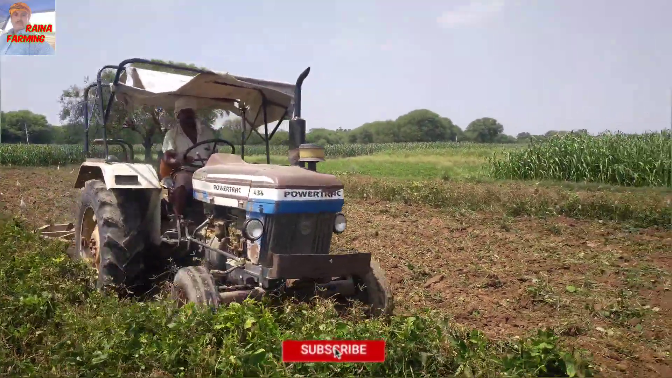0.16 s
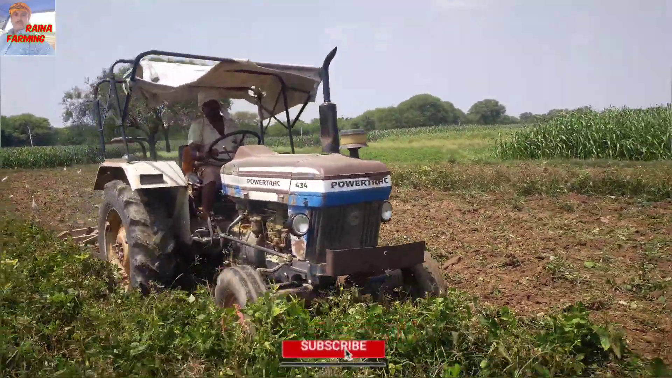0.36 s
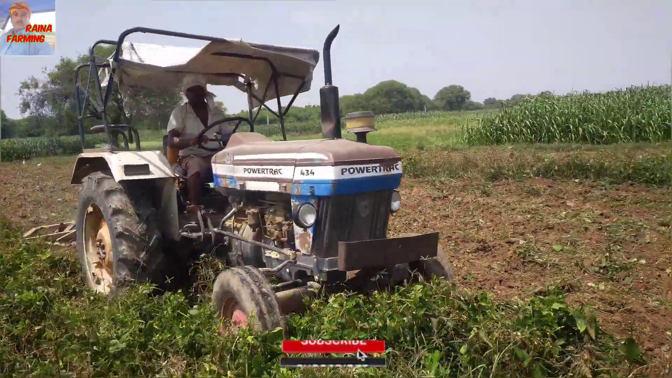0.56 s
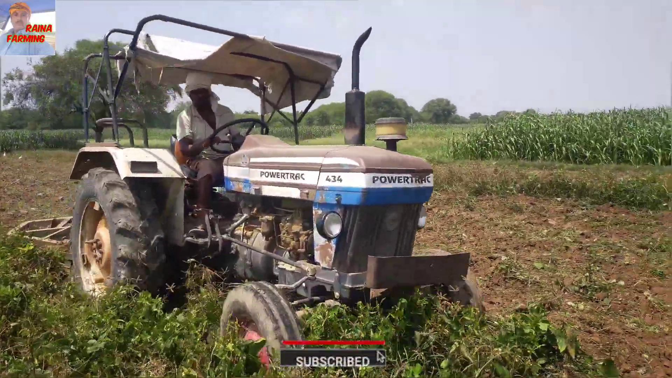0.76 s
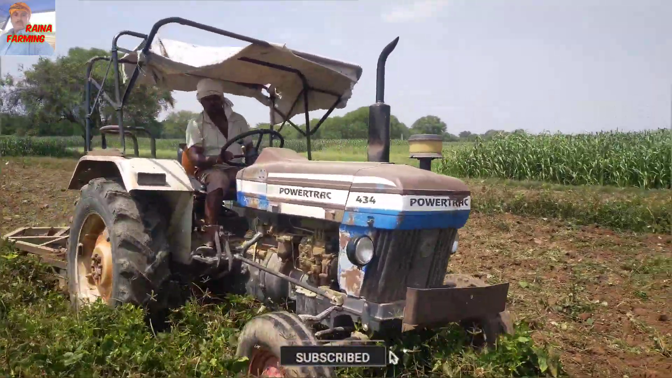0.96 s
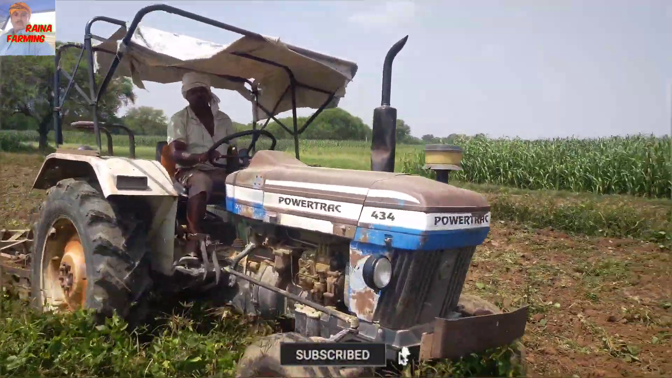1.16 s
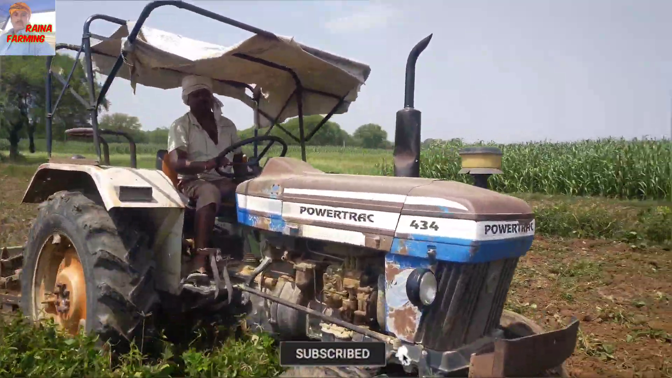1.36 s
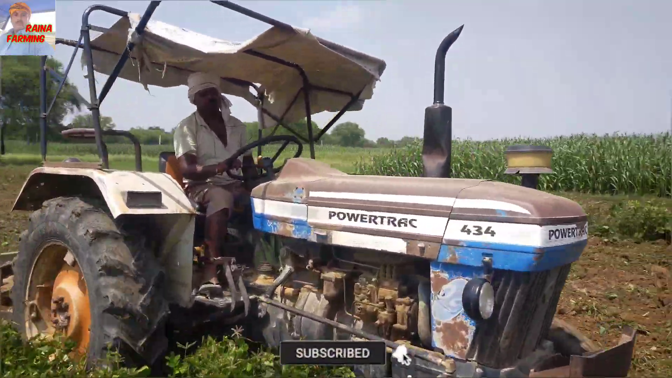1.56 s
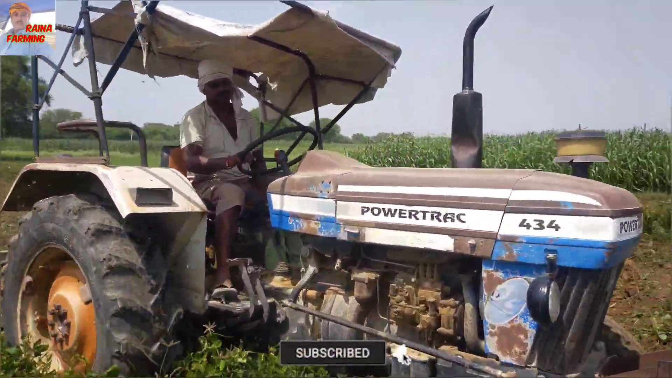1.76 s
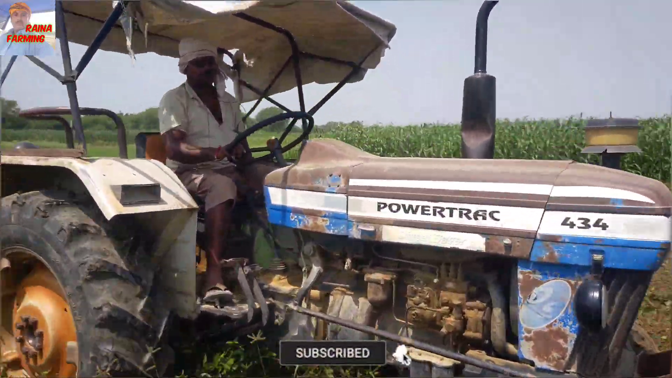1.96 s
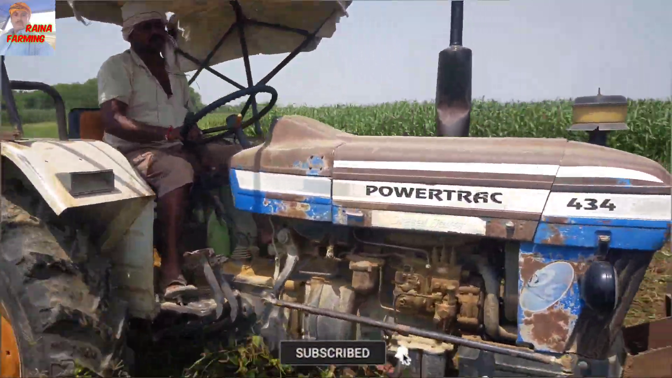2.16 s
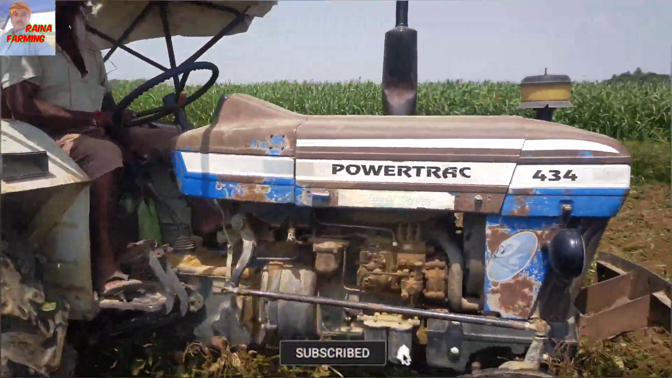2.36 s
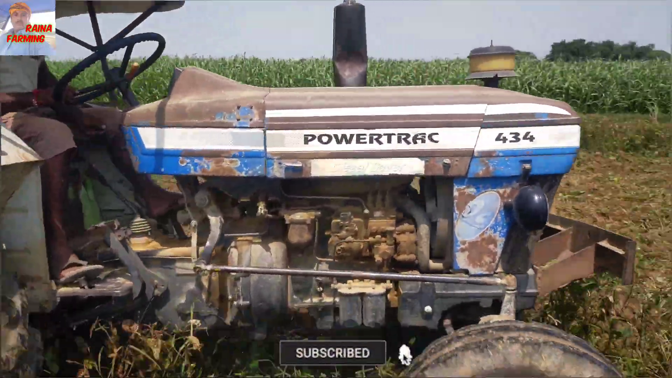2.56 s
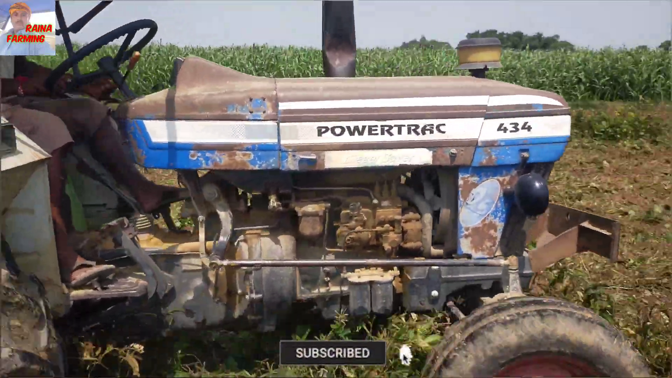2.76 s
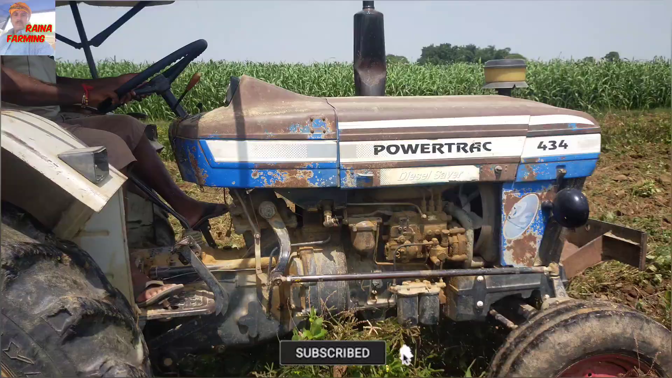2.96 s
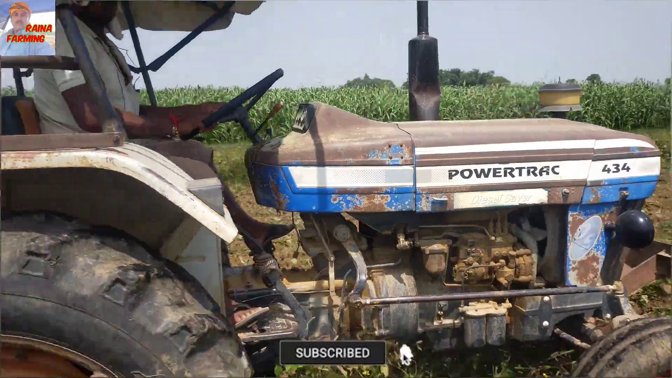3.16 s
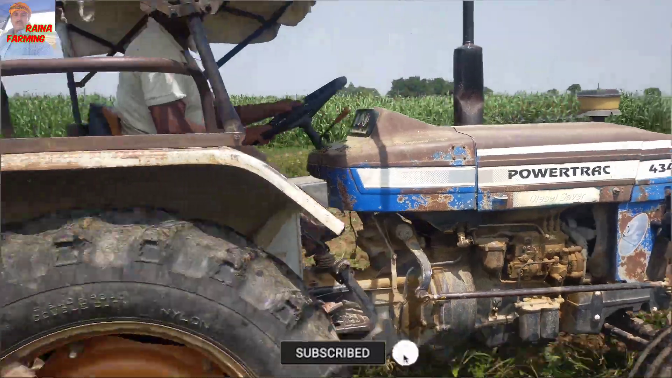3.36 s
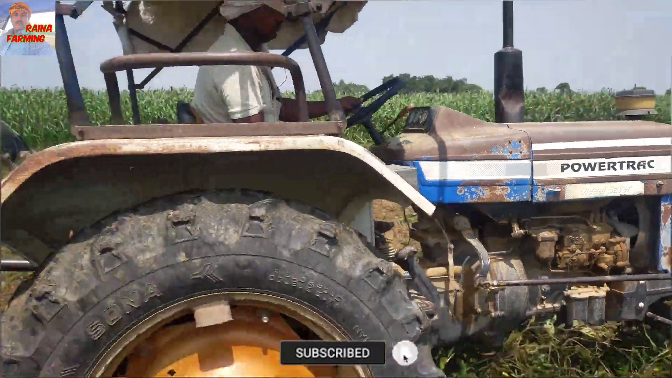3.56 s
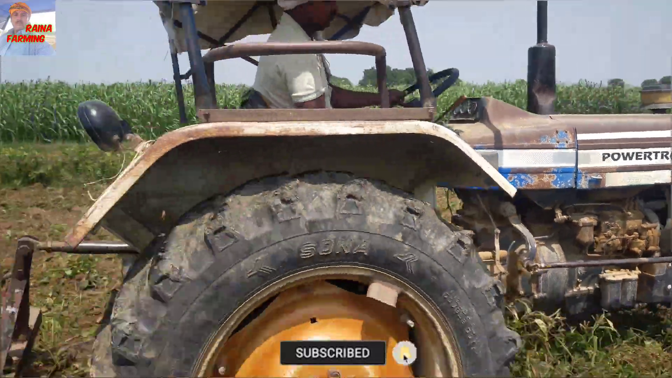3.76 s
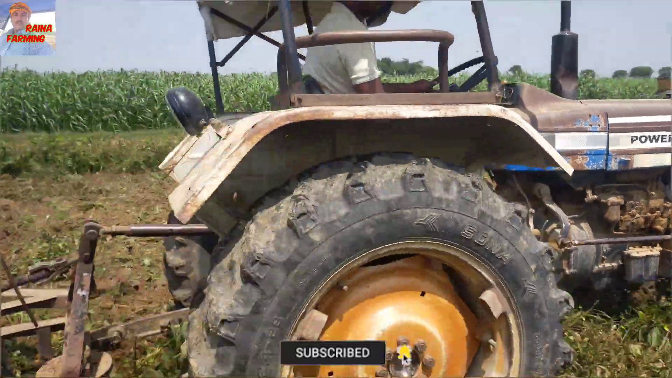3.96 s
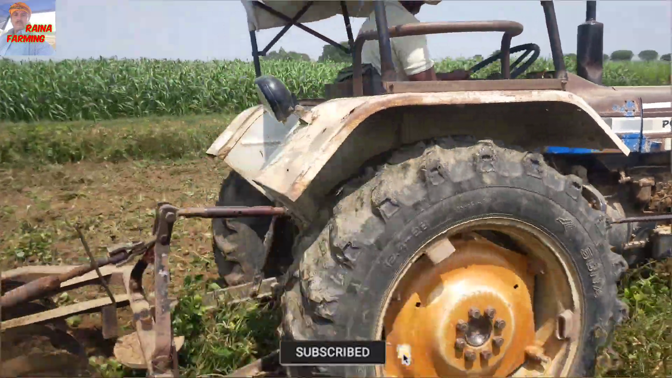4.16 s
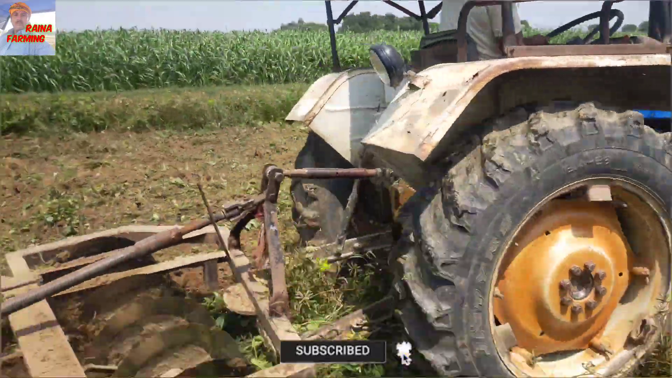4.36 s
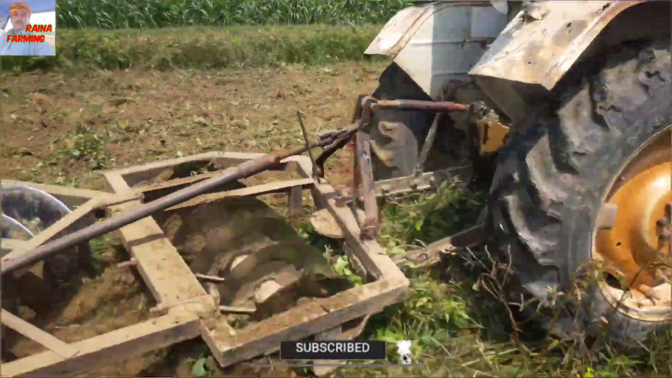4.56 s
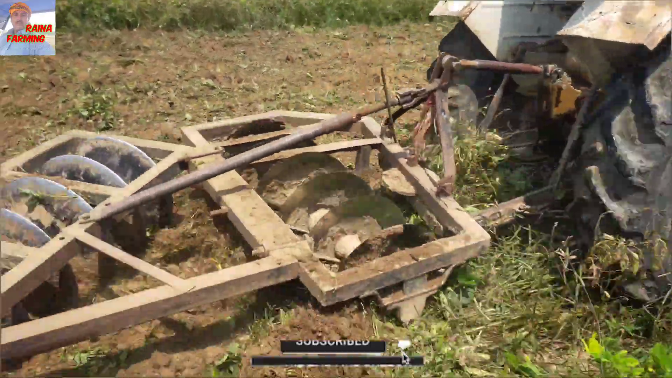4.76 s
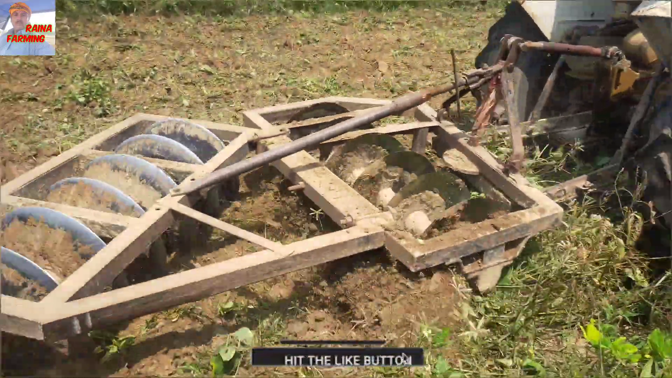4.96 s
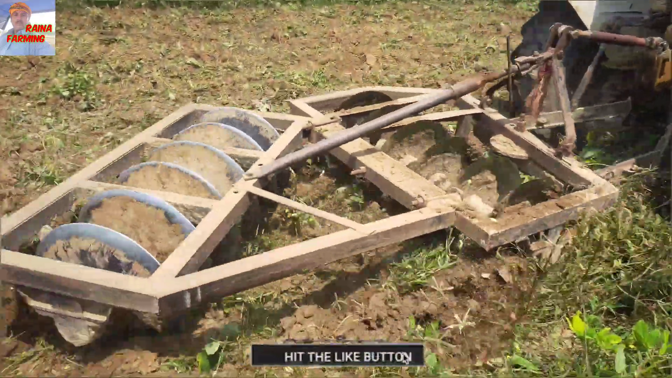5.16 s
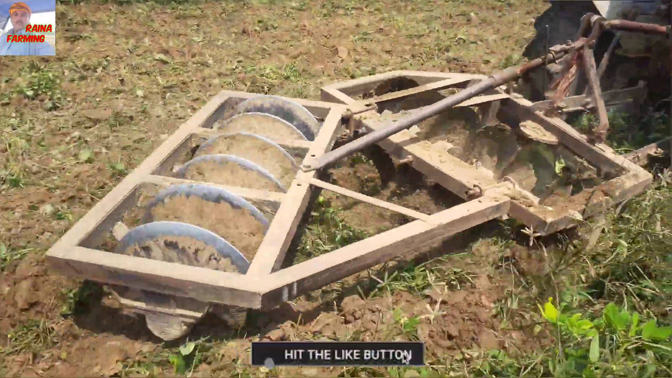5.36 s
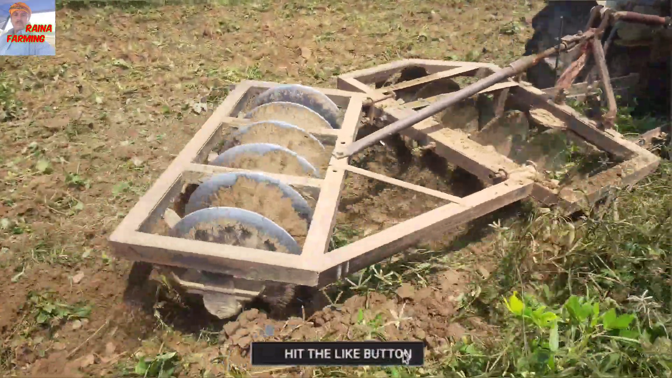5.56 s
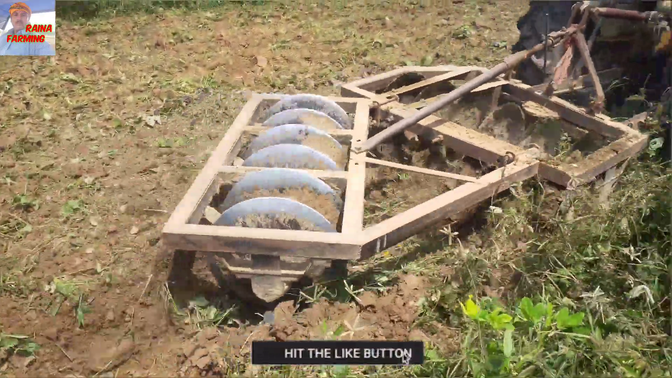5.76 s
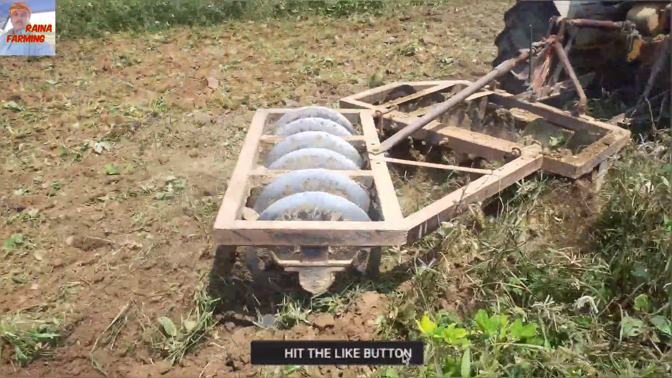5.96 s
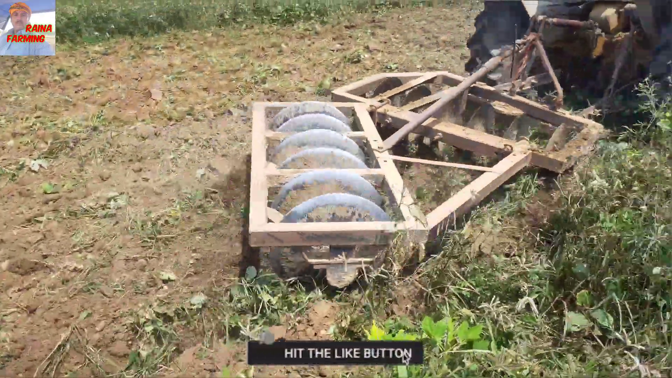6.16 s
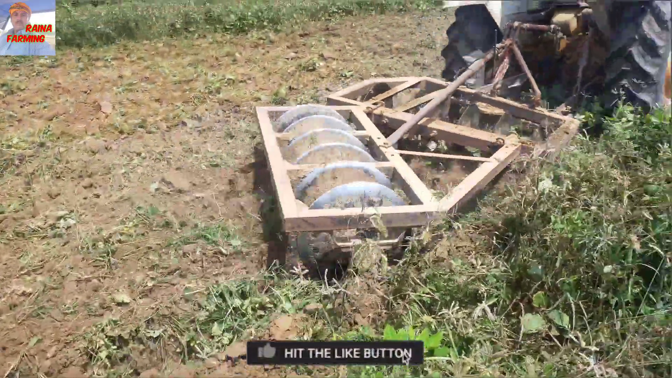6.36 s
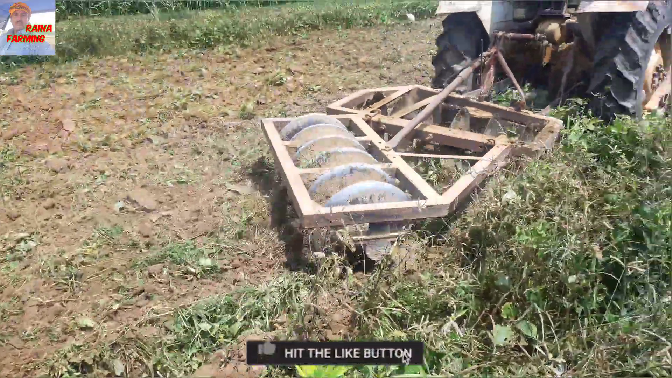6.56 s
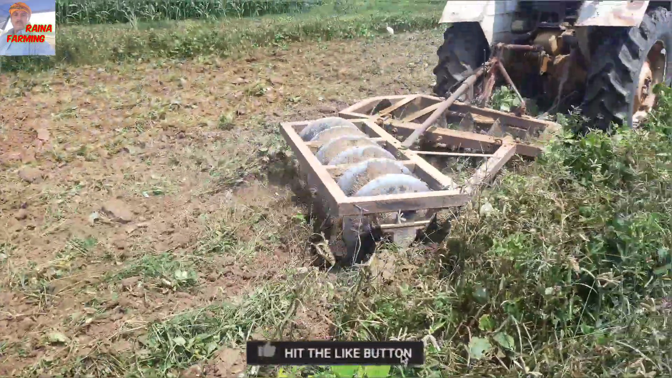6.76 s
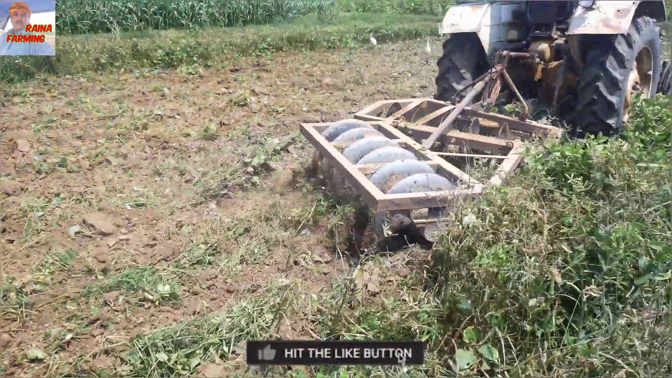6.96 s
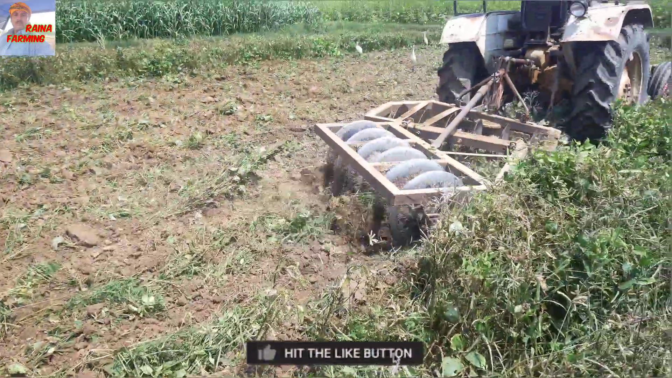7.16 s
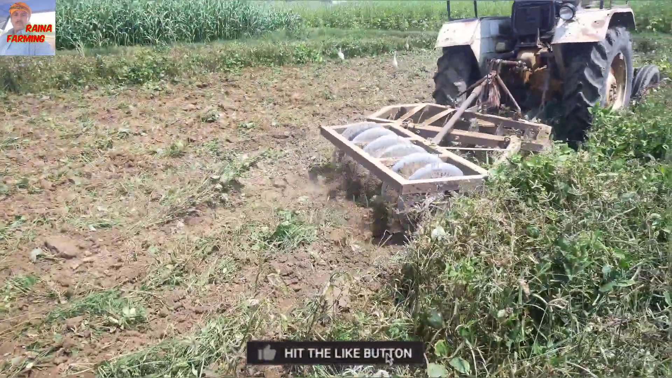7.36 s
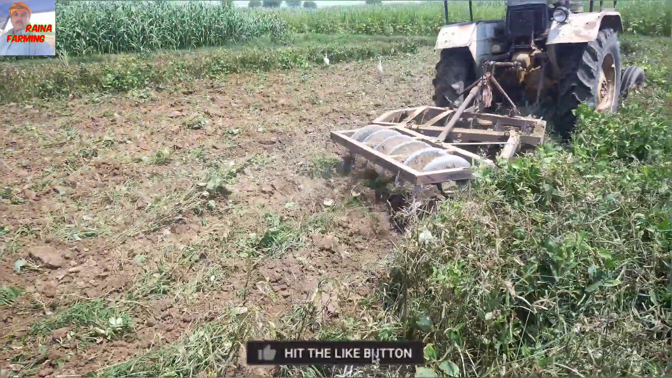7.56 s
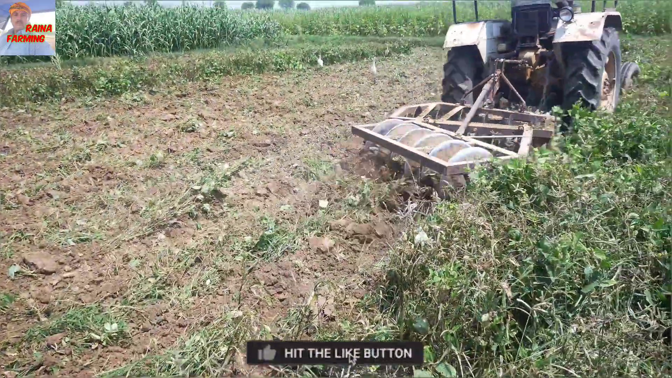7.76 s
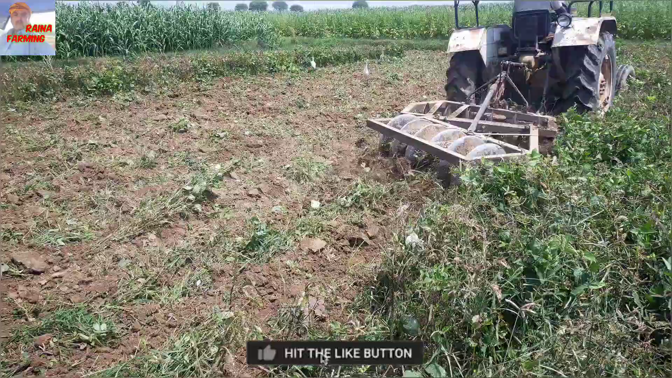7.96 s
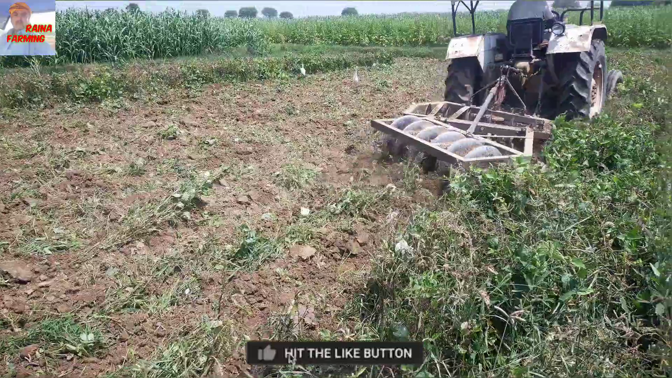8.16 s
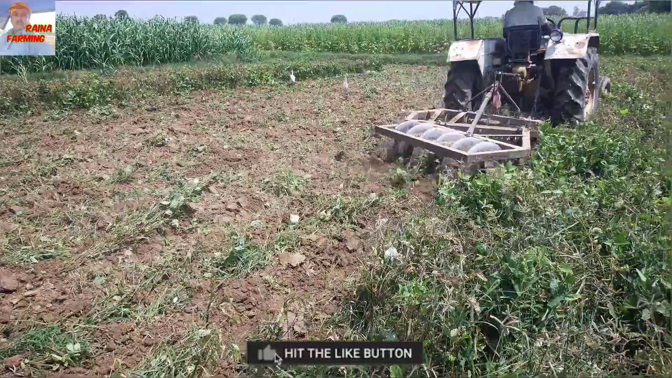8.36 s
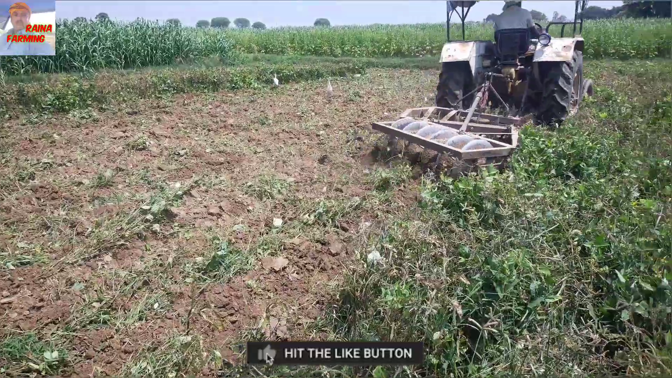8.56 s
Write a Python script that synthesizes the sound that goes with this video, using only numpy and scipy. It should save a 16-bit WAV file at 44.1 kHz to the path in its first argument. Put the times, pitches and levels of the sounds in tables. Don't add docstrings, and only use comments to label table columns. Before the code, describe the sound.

A three-cylinder diesel tractor hammers past at close range, knocking and clattering, then recedes across the field with faint bearing squeaks and valve ticks.

```python
import sys
import numpy as np
from scipy import signal
from scipy.fft import rfft, irfft, next_fast_len
from scipy.io import wavfile
from scipy.ndimage import map_coordinates

SR = 44100
rng = np.random.default_rng(int(sys.argv[2]) if len(sys.argv) > 2 else 0)


def put_to_file(sound):
    columns = np.atleast_2d(sound).T
    safe = np.clip(columns, -1, 1)
    whole_steps = np.round(safe * 32767)
    wavfile.write(sys.argv[1], SR, whole_steps.astype(np.int16))


def invert_db(level):
    return 10 ** (np.asarray(level, dtype=float) / 20)


N = 379260
T = np.arange(N) / SR

# time in seconds, firings a second.
FIRING_RATE = [(0.0, 40.87), (0.8, 40.8), (1.6, 41.5), (2.0, 41.28), (2.4, 41.57), (2.8, 41.03),
               (3.6, 40.68), (4.4, 40.95), (4.8, 40.47), (5.2, 40.81), (6.0, 40.87), (6.4, 41.24),
               (7.6, 40.4), (8.0, 40.98), (8.6, 40.42)]
# time in seconds, turn (0 front, 1 side, 2 quarter, 3 rear),
# ground notch in Hz, knock sharpness 0-1.
ATTITUDE = [
    (0, 0, 686, 0.4),
    (1, 0.76, 660, .58),
    (1.6, 0.75, 676, 0.34),
    (3, 1.5, 734, 0.47),
    (4.1, 2.06, 710, 0.34),
    (4.7, 2, 770, 0.16),
    (6, 2.5, 772, 0.05),
    (7, 3, 686, 0.3),
    (8.6, 3, 633, 0.3),
]
# time in seconds, level in dB.
CLOSENESS = [(0, -3), (.24, -3), (.91, -2), (1.27, 0.5), (1.34, -3), (1.45, 0), (1.89, 1), (1.96, -0.5),
             (2.68, -1.5), (3.1, -0.5), (4.25, -1.5), (4.6, -2.5), (5.1, -6), (5.77, -8.5), (6.5, -11),
             (7, -11.5), (8, -15.5), (8.6, -15.5)]
BODY_LEVELS = {"rumble": (-29, -26.5, -24, -23.5), "knock": (-16.5, -17, -17, -16),
               "clatter": (-33, -34, -31.5, -33), "hiss": (-37.5, -38, -35, -35.5),
               "panel": (-27.5, -29.5, -31.5, -37.5), "low gear": (-44.5, -42, -40, -38),
               "high gear": (-33.5, -34.5, -32.5, -29)}
# share of closeness followed, loss broadside in dB,
# level in dB from front, side, quarter, rear.
EXHAUST_GROUPS = [
    (0.24, 1, -39, -34, -35, -34),
    (0.11, 7, -26, -35.5, -31.5, -30.5),
    (0.45, 3.5, -38.5, -31, -36.5, -35.5),
    (1, -1, -46, -38, -38, -49),
    (0.76, -4, -48, -43, -40, -43.5),
]
# multiple of the engine cycle, level in dB, group (fractions cut toward zero).
UPPER_TONES = [(6.99, -6.5, -0.5), (9, -2.5, 0), (11.98, -4, 0), (13.02, -12, 1.5), (15, -0.5, 1),
               (19, -15.5, 2), (20, -6.5, 2.2)]
# centre in seconds, length in seconds, swell in dB.
STACK_LEANS = [
    (1.85, 1, 3.5),
    (4.06, .9, 6.5),
    (3.2, 0.16, 1),
]
# frequency in Hz, density in dB per Hz.
RUMBLE_COLOUR = [(30, -26), (60, -14), (100, -10.5), (150, -9), (244, -5.5), (400, -2.5), (555, 1.5),
                 (724, -4.5), (900, -4.5), (1170, -34), (1980, -120)]
# frequency in Hz, density in dB per Hz.
KNOCK_FRONT = [(440, -66), (750, -11), (851, -9), (1050, -9.5), (1290, -4.5), (1540, -11.5), (1730, -11),
               (2220, -3.5), (2600, -9), (4000, -27), (5200, -36), (8800, -120)]
# frequency in Hz, density in dB per Hz.
KNOCK_SIDE = [(440, -43), (750, -4), (900, 0.5), (1270, -1.5), (1540, -5.5), (1790, -5), (2070, -3),
              (3450, -22.5), (4000, -24), (4600, -28), (5200, -27), (8800, -120)]
# frequency in Hz, density in dB per Hz.
KNOCK_QUARTER = [(440, -39), (750, -8), (860, 0), (1250, -4.5), (1510, -7.5), (1810, -2.5), (2200, -4.5),
                 (2700, -12), (3200, -20), (4000, -24), (5200, -47), (8800, -120)]
# frequency in Hz, density in dB per Hz.
KNOCK_REAR = [(440, -18), (750, -0.5), (1130, -3), (1370, -12.5), (1600, -7), (1860, -9.5), (2430, -11.5),
              (3050, -22.5), (3400, -48), (4000, -49), (5200, -67), (8800, -120)]
# frequency in Hz, density in dB per Hz.
CLATTER_COLOUR = [(1760, -11), (3000, -4), (3400, 0.5), (3850, -8.5), (4250, -6), (4800, -6), (5370, -6),
                  (5650, -7), (6050, -5.5), (6700, -9.5), (8020, -20), (9500, -33), (12400, -60),
                  (20900, -120)]
# frequency in Hz, density in dB per Hz.
HISS_COLOUR = [(5000, -26), (8500, -12), (11100, -1.5), (13800, -1.5), (15200, -2.5), (17000, -9.5)]
# level in dB of cylinders one, two, three.
CYLINDER_DB = [
    (-1.4, 1, -3.1),
    (-0.71, 0.52, -0.94),
]
# frequency in Hz, width in Hz, level in dB from front, side, quarter, rear.
CASTING_MODES = [(1053.6, 28, -16, -22, -14, -20.5), (1182, 21, -18, -18, -17, -11.5),
                 (1444, 29, -6.5, -14, -16, -15), (1797, 62, -13, -11, -9.5, -25),
                 (2027, 82, -12, -12, -14, -16), (2257, 50, -18, -8.5, -11, -22.5),
                 (2590, 66, -20, -14, -12.5, -24), (3124, 64, -13, -30, -21, -30)]
# centre in seconds, length in seconds, strength lost.
ECHO_LOSS = [
    (3.3, 3.4, 0.12),
]
# centre in seconds, length in seconds, swell in dB.
PANEL_SWELLS = [
    (.45, 0.43, 8),
    (.95, .9, 10),
    (1.7, .5, 0),
    (2.2, .5, 5),
    (2.94, .15, 1),
]
# time in seconds, frequency in Hz.
HIGH_GEAR_PITCH = [(0, 876), (2.25, 884), (2.38, 918), (2.7, 912), (2.9, 880), (5.6, 876), (8.6, 868)]
# centre in seconds, length in seconds, swell in dB.
LOW_GEAR_SWELLS = [
    (.72, .4, 7.5),
    (1.8, 0.38, 5),
    (2.25, .3, 11),
    (2.78, 0.45, 13.5),
    (5.2, 0.44, 15.5),
    (5.75, 0.95, 12.5),
    (6.3, .5, 9),
]
# centre in seconds, length in seconds, swell in dB.
HIGH_GEAR_SWELLS = [
    (1.15, 0.66, 8),
    (1.9, 0.65, 7.9),
    (2.52, 0.48, 11),
    (2.94, .15, 4),
    (4.1, 0.73, 6.3),
    (5.75, 0.6, 10.6),
    (8.6, 1, 7.8),
]
# time in seconds, peak in dB, frequency rung in Hz.
COMING_KNOCKS = [(0.0967, -8, 1270), (0.1466, -8, 1310), (0.171, -10, 1280), (0.2199, -8, 1330),
                 (0.2947, -8.5, 1290), (0.3667, -8, 1290), (0.399, -6, 1300), (0.4408, -4.5, 1277),
                 (0.514, -10, 1280), (0.5874, -7.5, 1288), (0.66, -11, 1280), (0.6873, -5.5, 1268),
                 (0.7336, -5, 1260), (0.788, -6.5, 2020), (0.8078, -7, 1280), (0.8824, -10, 1240),
                 (0.955, -10, 1260), (1.0313, -8, 1040), (1.051, -3, 1300), (1.123, -5.5, 1340),
                 (1.1784, -7, 1340), (1.3244, -8.5, 1420), (1.3478, -5, 1300), (1.3967, -10, 1350),
                 (1.467, -6, 1340), (1.6826, -7, 1287), (1.8046, -7, 1180), (1.997, -9, 1220)]
# time in seconds, peak in dB, frequency rung in Hz.
PASSING_KNOCKS = [(2.071, -7, 1280), (2.1432, 0, 1290), (2.17, -5, 1170), (2.215, 1, 1300),
                  (2.239, -8, 1090), (2.2616, -4, 1260), (2.2908, -9.5, 1080), (2.3596, -12, 1200),
                  (2.387, -8, 910), (2.5063, -13, 923), (2.554, -8.5, 1138), (2.5726, -11, 1160),
                  (2.646, -15, 1280), (2.6944, -8, 1280), (2.767, -9, 1290), (2.789, -8, 1100),
                  (2.8964, -11, 1220), (2.9425, -11, 1250), (2.9864, -9, 1230), (3.1389, -12, 1790),
                  (3.1663, -11.5, 1150), (3.2122, -7, 1213), (3.3085, -5, 1890), (3.383, -7, 1774),
                  (3.4561, -3, 1280), (3.6751, -7, 1330), (3.7016, -13, 1200), (3.7242, -11, 1230),
                  (3.7714, -10, 1020), (3.7999, -8, 1100), (3.8452, -6, 1010), (3.9003, -4, 1720),
                  (3.9251, -7, 1080), (4.0458, -6, 1426), (4.1187, -8, 1250), (4.262, -5, 1280),
                  (4.4364, -10, 1970), (4.482, -8, 1820), (4.5583, -8, 1950), (4.6305, -9, 1150),
                  (4.7312, -10, 1960), (4.7801, -13, 1880), (4.852, -9, 1860), (4.9268, -11, 1830),
                  (5.443, -15, 1740), (5.5155, -10, 1840), (5.5638, -20, 1770), (5.593, -12, 1950),
                  (5.8103, -12, 1790), (5.8367, -14, 1650), (5.8612, -12, 1210)]
# centre in seconds, length in seconds, level over calm in dB.
WIND_GUSTS = [(.18, .12, 19), (.42, .3, 21), (.64, .12, 19), (.78, .1, 13), (.96, 0.065, 19),
              (1.15, .2, 10), (1.45, .2, 6), (1.95, .3, 4), (3.03, 0.16, 18), (3.27, .15, 22),
              (3.47, 0.11, 24), (3.66, .2, 21), (3.88, .1, 31), (4.03, .12, 19), (4.4, .4, 16),
              (4.9, 0.26, 6), (6, .3, 7), (7.33, .2, 12)]
# multiple of the engine cycle, centre in seconds,
# length in seconds, level in dB.
SHAFT_LINES = [(31.86, 0.99, 1.6, -41), (29.9, .3, 0.55, -42.5), (36.9, 1, 1, -41), (26.1, 0.61, 0.82, -47),
               (21.6, 1.65, .4, -36), (40.1, 1.5, .5, -43), (26.7, 2.94, 0.44, -34.5), (43.4, 3.5, .5, -38),
               (42.9, 3.7, 0.27, -34), (33.4, 4, 0.48, -45), (21, 3.9, 0.93, -34.5), (22.4, 5.9, 0.37, -40),
               (13.2, 4.2, 0.79, -43), (33, 4.95, .5, -41), (23, 6, .3, -41), (42.9, 5.8, 1, -38.5),
               (20.9, 1.64, 1.4, -42), (17.7, 1.5, 0.87, -50), (23.7, 1.2, 1.3, -39.5),
               (12.86, 0.68, 0.76, -55), (28.3, 2.9, .3, -44)]
# time in seconds, peak in dB, frequency in Hz.
STEEL_TICKS = [(.715, -16, 2030), (.829, -27, 4560), (1.178, -30, 5290), (1.198, -25, 6540),
               (1.342, -29, 6700), (2.382, -27, 4070), (2.526, -32, 5800), (3.963, -27, 5540),
               (4.512, -16, 2540), (4.537, -26, 5140), (4.562, -16, 2290), (4.66, -16, 2500),
               (4.81, -17, 2550), (7.64, -40, 3520), (8.053, -37, 6000)]
# start in seconds, length in seconds, level in dB, starting frequency in Hz.
BEARING_SQUEAKS = [(1.565, .03, -44, 9900), (2.46, .045, -39, 9930), (3.677, .125, -34.5, 9900),
                   (3.994, 0.057, -28, 9910), (4.535, 0.14, -34.5, 9870), (5.065, 0.023, -34.5, 9940),
                   (5.794, .022, -36, 9890), (5.889, 0.064, -28, 9760), (5.965, .012, -44, 9900),
                   (6.883, 0.096, -31.5, 9800), (6.998, .012, -46, 9900), (7.402, .065, -43.5, 9860),
                   (7.61, .015, -59, 9900), (7.64, .025, -59, 9900), (7.731, 0.016, -37, 9880),
                   (7.743, 0.038, -29, 9890), (7.805, .04, -59, 9900)]
# time in seconds, peak in dB.
VALVE_SPITS = [(5.2947, -27), (5.5122, -29), (5.586, -32), (6.1737, -35), (6.5668, -31), (6.9783, -38),
               (7.2228, -37), (7.3435, -40), (7.4188, -41), (7.568, -35), (7.6418, -36), (7.7192, -40),
               (7.793, -35), (7.8643, -38), (8.0828, -36), (8.1567, -32), (8.229, -36), (8.3033, -38),
               (8.3772, -38), (8.5373, -34)]
# time in seconds, length in seconds, level in dB, centre in Hz, width in Hz.
STONE_SCRAPES = [
    (6.586, 0.012, -21.5, 1040, 540),
    (7.1, 0.017, -33, 1600, 400),
    (6.584, 0.0091, -22.5, 2100, 980),
    (6.599, 0.021, -23, 2490, 520),
    (6.594, 0.014, -29.5, 3300, 1100),
    (6.596, 0.0085, -34, 4260, 810),
    (6.586, .03, -42, 14500, 2000),
    (6.64, .06, -46, 3400, 1300),
    (6.57, 0.023, -33, 2400, 1200),
]


def unit(x):
    return x / np.sqrt(np.mean(x ** 2) + 1e-20)


def curves(rows):
    s, *cols = np.transpose(rows)
    return [np.interp(T, s, c) for c in cols]


def wobble(rate):
    knots = rng.standard_normal(int(N * rate / SR) + 4)
    return np.interp(T * rate, np.arange(len(knots)), knots)


def filtered(x, response):
    m = next_fast_len(N + 8192)
    return irfft(rfft(x, m) * response(np.fft.rfftfreq(m, 1 / SR)), m)[..., :N]


def coloured(x, points):
    f, db = np.transpose(points)

    def response(hz):
        return invert_db(np.interp(np.log(hz + 1), np.log(f + 1), db, left=-120, right=-120))
    return unit(filtered(x, response))


def resonance(x, centre_hz, width_hz):
    return unit(signal.lfilter(*signal.iirpeak(centre_hz, centre_hz / width_hz, SR), x))


def swells(rows):
    coarse = T[::64]
    bumps = [height * np.exp(-(2 * (coarse - s) / length) ** 2) for s, length, height in rows]
    return np.interp(T, coarse, np.max(bumps, axis=0))


def level_db(view_db, follows=1):
    s, turn = np.transpose(ATTITUDE)[:2]
    coarse = T[::64]
    shown_db = np.interp(np.interp(coarse, s, turn), np.arange(len(view_db)), view_db)
    near_db = np.interp(coarse, *np.transpose(CLOSENESS))
    return np.interp(T, coarse, shown_db + follows * near_db)


def struck(rows, t60, rise, spread):
    out, t = np.zeros(N + SR), T[:SR // 12]
    for (s, db, hz), detune in zip(rows, rng.standard_normal((len(rows), 3))):
        ring = np.sin(2 * np.pi * hz * (1 + spread * detune[:, None]) * t).sum(0)
        out[round(s * SR):][:len(t)] += invert_db(db - 60 * t / t60) * (1 - np.exp(-t / rise)) * ring
    return out[:N]


def firings():
    return -.22 + np.cumsum(curves(FIRING_RATE)[0]) / SR


def flares(cylinder_db, delay, rise, fall, scatter_db, share):
    count = firings() - delay + 3
    index = count.astype(int)
    since = count - index
    size = invert_db(np.array(cylinder_db)[index % 3] + scatter_db * rng.standard_normal(400)[index])
    flare = unit(size * (1 - np.exp(-since / rise)) * np.exp(-since / fall))
    share = np.clip(share, 0, 1)
    return np.sqrt(1 - share + share * flare ** 2)


def exhaust():
    cycle = 2 * np.pi * (firings() - .12) / 3
    broadside = np.exp(-((T - 2.57) / 0.21) ** 2)
    groups = [level_db(view_db, follows) - lost_db * broadside for follows, lost_db, *view_db in EXHAUST_GROUPS]
    first_db, octave_db, *group_db = groups

    def tone(k, db, lead=0):
        return np.sqrt(2) * invert_db(db) * np.cos(k * cycle + lead + 0.44 * wobble(6))

    sway_db = swells(STACK_LEANS)
    upper = np.zeros(N)
    for k, db, g in UPPER_TONES:
        upper += tone(k, db + group_db[int(g)] + sway_db * (g > 0) + 0.98 * wobble(2.51))
    lead = .9 - .8 * np.minimum(curves(ATTITUDE)[0], 2)
    return tone(3, first_db + .7 * wobble(7.2), lead) + tone(6, octave_db + 0.58 * wobble(14)) + upper


def mechanical(repeat, drift):
    patterns = rng.standard_normal((int(T[-1] * drift) + 2, 3227))
    place = (firings() / 3 % 1 * patterns.shape[1]).astype(int)
    stage = (T * drift).astype(int)
    blend = np.pi / 2 * (T * drift - stage)
    same = np.cos(blend) * patterns[stage, place] + np.sin(blend) * patterns[stage + 1, place]
    repeat = np.clip(repeat, 0, 1)
    return np.sqrt(repeat) * same + np.sqrt(1 - repeat) * rng.standard_normal(N)


def castings(turn):
    instants = np.flatnonzero(np.diff(np.floor(firings() + .12)))
    out = np.zeros(N)
    for hz, width_hz, *view_db in CASTING_MODES:
        late, size = rng.standard_normal((2, 400))[:, :len(instants)]
        strikes = np.zeros(N)
        struck_at = instants + (abs(late) * 6 / hz * SR).astype(int)
        strikes[np.minimum(struck_at, N - 1)] = invert_db(2 * size)
        out += invert_db(np.interp(turn, np.arange(len(view_db)), view_db)) * resonance(strikes, hz, width_hz)
    return out


def ground(x):
    turn, notch_hz, _ = curves(ATTITUDE)
    dull = (0.68 - swells(ECHO_LOSS)) * filtered(x, lambda hz: 1 / np.sqrt(1 + (hz / 1400) ** 4))

    def treble_echo(hz):
        late = np.exp(-2j * np.pi * hz / 741)
        return late / np.sqrt(1 + (2300 / (hz + 1)) ** 6) / np.sqrt(1 + (hz / 7000) ** 8)

    grazing_from = 2.1
    grazing = 0.27 * np.clip((turn - grazing_from) / (3 - grazing_from), 0, 1)
    late_dull = map_coordinates(dull, [np.arange(N) - SR / (2 * notch_hz)], order=1)
    return x + late_dull + grazing * filtered(x, treble_echo) - grazing ** 2 / 2 * x


def block():
    parts = ("rumble", "knock", "clatter", "hiss")
    rumble_db, knock_db, clatter_db, hiss_db = (level_db(BODY_LEVELS[part]) for part in parts)
    turn, _, sharp = curves(ATTITUDE)
    shake = 0.84 * wobble(9) + .5 * wobble(25)
    knock_cylinders, hiss_cylinders = CYLINDER_DB

    blows = flares(knock_cylinders, delay=-.12, rise=.08, fall=.28, scatter_db=1, share=.4 * sharp)
    blows = blows * mechanical(.5, drift=2.5)
    knock = np.zeros(N)
    for k, view in enumerate((KNOCK_FRONT, KNOCK_SIDE, KNOCK_QUARTER, KNOCK_REAR)):
        knock += np.sqrt(np.clip(1 - abs(turn - k), 0, 1)) * coloured(blows, view)

    taps = flares(knock_cylinders, delay=-0.26, rise=.1, fall=0.18, scatter_db=3.5, share=0.6 * sharp)
    clatter = coloured(taps * rng.standard_normal(N), CLATTER_COLOUR)

    spits = flares(hiss_cylinders, delay=-0.33, rise=.03, fall=0.22, scatter_db=0.5, share=0.47 * sharp)
    stack = flares((-9, 3, -9), delay=-.2, rise=.02, fall=.07, scatter_db=2.5, share=.025 * turn)
    hiss = coloured(spits * stack * rng.standard_normal(N), HISS_COLOUR)

    throbs = flares(knock_cylinders, delay=-.1, rise=.1, fall=.3, scatter_db=1.2, share=.15)
    rumble = coloured(throbs * mechanical(.4, drift=.7), RUMBLE_COLOUR)

    body = invert_db(knock_db - 3.5 + shake) * (knock + invert_db(-0.5) * castings(turn))
    body += invert_db(clatter_db + shake + 0.66 * wobble(6.2)) * clatter
    body += invert_db(hiss_db + 1.0 * shake + 0.6 * wobble(11)) * hiss
    body += invert_db(rumble_db + 0.73) * rumble
    return invert_db(-1.0) * ground(body)


def bonnet():
    panel_db = level_db(BODY_LEVELS["panel"]) + swells(PANEL_SWELLS)
    rung = flares((1.5, .5, -20), delay=-.25, rise=.04, fall=.65, scatter_db=.8, share=.99)
    panel_hz = 1281
    drive = rung * np.cos(2 * np.pi * panel_hz * T + .55 * wobble(25))
    return invert_db(panel_db - 1.0) * unit(resonance(drive, panel_hz, 260))


def gears():
    low_db = level_db(BODY_LEVELS["low gear"]) + swells(LOW_GEAR_SWELLS)
    high_db = level_db(BODY_LEVELS["high gear"]) + swells(HIGH_GEAR_SWELLS)

    def mesh(turns):
        return np.sqrt(2) * np.cos(2 * np.pi * turns + .9 * wobble(18))

    low = invert_db(low_db - 3 + 2.5 * wobble(12)) * mesh(40 * firings() / 3)
    high_turns = np.cumsum(curves(HIGH_GEAR_PITCH)[0]) / SR
    return low + invert_db(high_db - 4.5 + 2.6 * wobble(12)) * mesh(high_turns)


def hard_knocks():
    rows = COMING_KNOCKS + PASSING_KNOCKS
    marks = np.bincount([round((s + 0.0036) * SR) for s, *_ in rows], minlength=N)
    lull_s, lull_share = .012, .55
    lull = signal.fftconvolve(marks, np.hanning(int(2 * lull_s * SR)), "same")
    rung = struck(COMING_KNOCKS, .065, .0016, spread=.025)
    rung += struck(PASSING_KNOCKS, .045, .0016, spread=.06)
    cracks = struck([(s, db - 12.5, 2197) for s, db, _ in rows], 0.024, 0.00056, spread=0.197)
    return invert_db(-2.5 - 7.5) * rung + cracks, 1 - lull_share * np.clip(lull, 0, 1)


def valve():
    valve_hz, width_hz, view_db = 13800, 700, (-75, -72, -68, -69)
    ticks = flares((-40, 0, -40), delay=-.2, rise=.02, fall=.06, scatter_db=3, share=1)
    narrow = resonance(ticks * rng.standard_normal(N), valve_hz, width_hz)
    steady = invert_db(level_db(view_db, follows=.2)) * resonance(narrow, valve_hz, 2 * width_hz)
    whistle = struck([(s, db - 11, valve_hz) for s, db in VALVE_SPITS], .03, .0005, spread=.012)
    splash = struck([(s, db - 9, 12800) for s, db in VALVE_SPITS], .016, .0003, spread=.1)
    return steady + whistle + splash


def wind():
    buffet = coloured(rng.standard_normal(N), [(8, -20), (14, -2), (28, 0), (60, -5), (150, -40)])
    calm_db = -56.5
    return invert_db(calm_db + swells(WIND_GUSTS)) * unit(invert_db(4 * wobble(16)) * buffet)


def shaft_lines():
    cycle, out = 2 * np.pi * firings() / 3, np.zeros(N)
    drift = .3 * wobble(5)
    for k, s, length, db in SHAFT_LINES:
        i = slice(max(round((s - length) * SR), 0), round((s + length) * SR))
        swell = np.exp(-(2 * (T[i] - s) / length) ** 4)
        out[i] += np.sqrt(2) * invert_db(db) * swell * np.cos(k * cycle[i] + drift[i])
    return out


def steel_ticks():
    return invert_db(-7.0) * struck(STEEL_TICKS, 0.041, 0.00068, spread=0.012)


def squeaks():
    top_hz, slips_a_s, grows_db, slip_db = 9930, 53, 3, 15
    out = np.zeros(N)
    unsteady = wobble(40)
    for s, length, db, hz in BEARING_SQUEAKS:
        i = slice(round(s * SR), round((s + length) * SR))
        u = (T[i] - s) / length
        slip = np.cos(2 * np.pi * np.cumsum(slips_a_s * (1 + 0.32 * unsteady[i])) / SR - 2)
        depth_db = slip_db * np.clip((-db - 31) / 6, .15, 1)
        grip_db = db + grows_db * (u - .5) - depth_db * np.clip(-slip, 0, 1) ** 2 + 2.8 * unsteady[i]
        edge = np.clip(np.minimum(u, 1 - u) * length / 0.0054, 0, 1)
        squeal = np.sin(2 * np.pi * np.cumsum(hz + (top_hz - hz) * u) / SR)
        out[i] += np.sqrt(2) * invert_db(grip_db) * edge * squeal
    return out


def stone():
    out = np.zeros(N)
    for s, length, db, hz, width_hz in STONE_SCRAPES:
        edges_hz = [hz - width_hz / 2, hz + width_hz / 2]
        band = signal.butter(2, edges_hz, "bandpass", fs=SR, output="sos")
        i = slice(round((s - 2 * length) * SR), round((s + length) * SR))
        scrape = unit(signal.sosfilt(band, rng.standard_normal(len(T[i]))))
        out[i] += invert_db(db) * np.exp(-(2 * (T[i] - s) / length) ** 4) * scrape
    return out


def scene():
    knocks, lull = hard_knocks()
    body = block() + bonnet()
    ringing = filtered(body, lambda hz: 1 / (1 + (800 / (hz + 1)) ** 8) / (1 + (hz / 3200) ** 8))
    engine = body - (1 - lull) * ringing + knocks
    tractor = exhaust() + engine + gears() + shaft_lines() + valve()
    harrow = steel_ticks() + squeaks() + stone()
    return (tractor + harrow + wind())[None]


def top_cut(x):
    return signal.sosfilt(signal.butter(12, 15400, fs=SR, output="sos"), x)


def record(dry):
    squeezed = dry / (1 + abs(dry / .55) ** 6) ** (1 / 6)
    mix = filtered(squeezed, lambda hz: hz < 15500)
    return top_cut(mix)


dry = scene()
out = record(dry)
put_to_file(out)
```